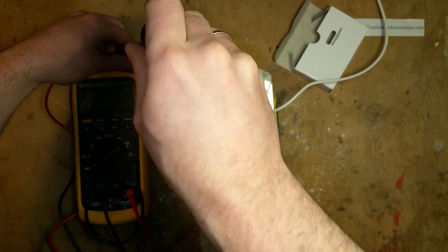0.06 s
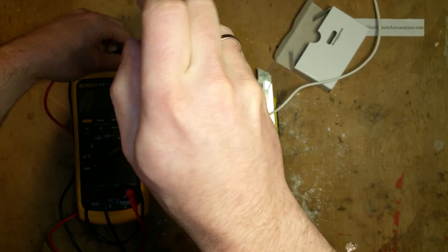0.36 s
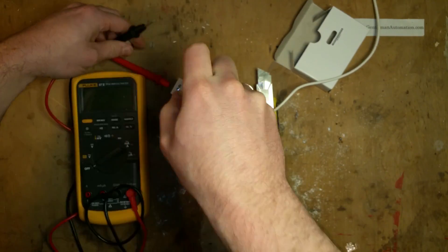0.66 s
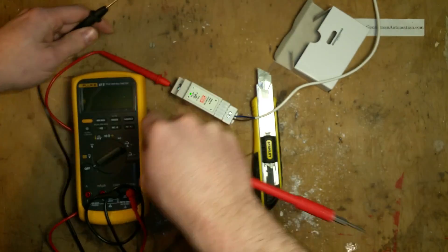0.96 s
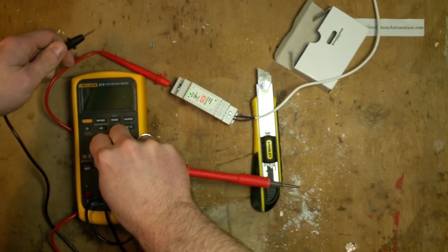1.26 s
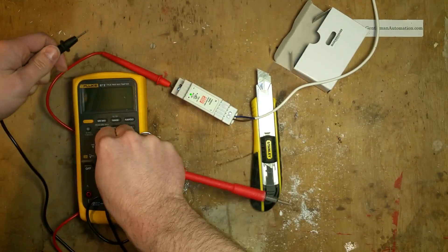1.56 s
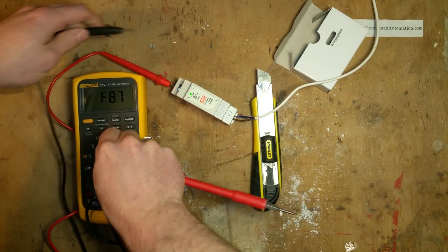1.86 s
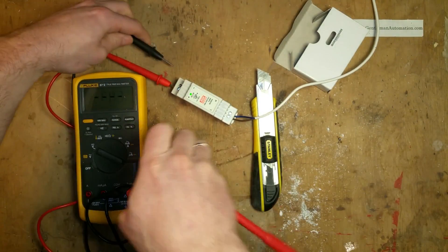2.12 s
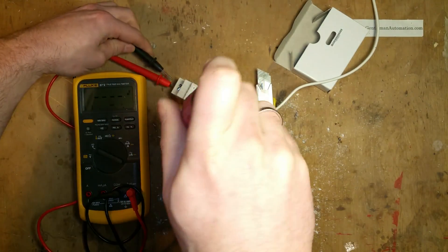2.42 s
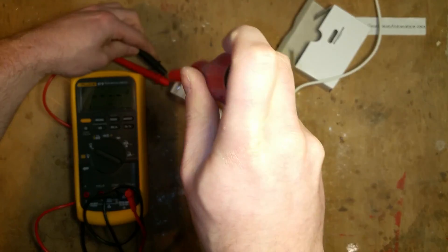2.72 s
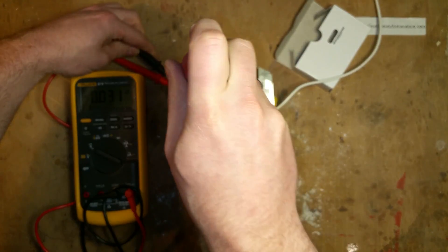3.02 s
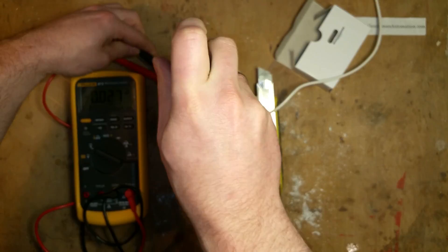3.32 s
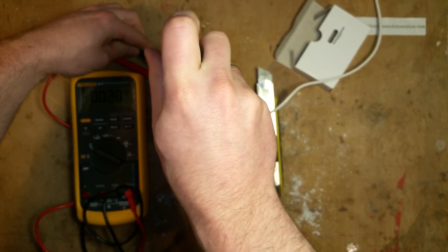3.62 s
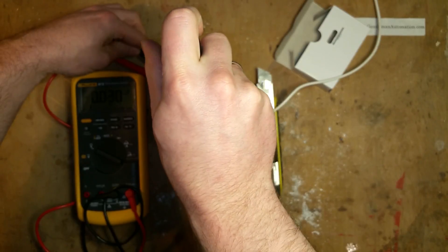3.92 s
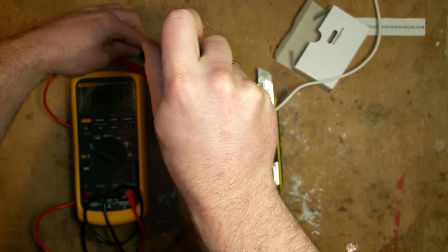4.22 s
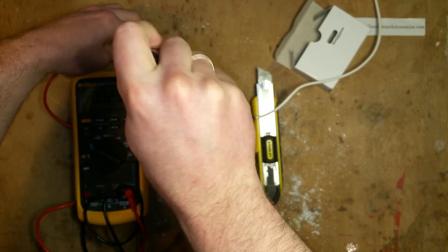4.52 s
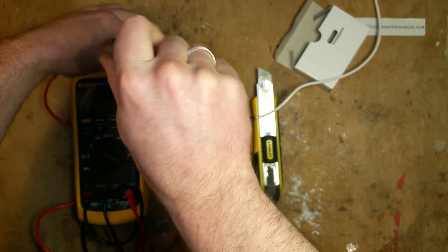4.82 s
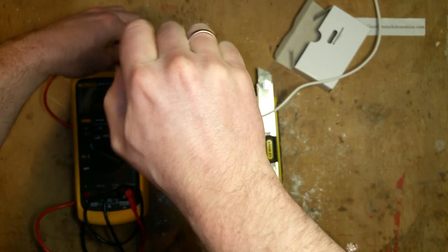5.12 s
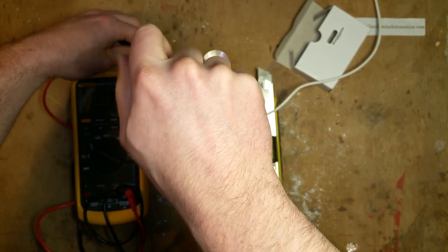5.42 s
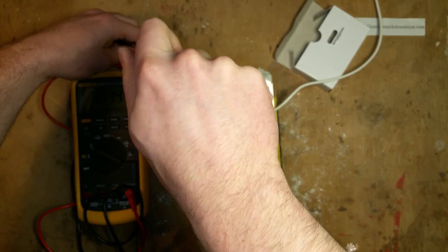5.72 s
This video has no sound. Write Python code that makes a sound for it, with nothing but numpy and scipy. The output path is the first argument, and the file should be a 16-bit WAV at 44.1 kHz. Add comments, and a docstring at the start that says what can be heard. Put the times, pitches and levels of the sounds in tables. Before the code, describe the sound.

The microphone is just above a wooden workbench in a quiet, dry room with a faint low rumble. After slight chattering, a small plastic power supply tips and clatters onto the bench at about 0.25 seconds, the loudest sound, with a woody thud and a hard plastic click. Faint scratches of a probe tip on a screw and small taps follow until 0.9 seconds. A multimeter's rotary switch clicks crisply at 1.55 seconds and more softly at 1.75. A dull little bump comes at 2.2 seconds, then a lull with faint rustles of hands and leads and tiny ticks. From 3.4 seconds the probes tap lightly on the terminals, with a soft knock at 3.4, a small ping at 3.6, and more taps near 3.7, 4.3 and 4.7. Quiet rattles, taps and faint scrapes continue from 5.2 to about 5.9 seconds.

```python
"""Meter probes on a workbench

A quiet, dry room, the microphone just above a wooden bench. Probes press on the screw terminals of a
small plastic power supply; the box tips and clatters down, each contact ringing bench, box and probe.
The meter's rotary switch clicks twice as a sprung ball drops into its notches. Then the probes tap and
scratch at the screws again, among faint rustles and ticks."""
import sys
import numpy as np
from scipy import signal
from scipy.fft import rfft, irfft
from scipy.io import wavfile
from scipy.ndimage import uniform_filter1d

SR = 44100
rng = np.random.default_rng(int(sys.argv[2]) if len(sys.argv) > 2 else 0)


def file_out(sig):
    """Save sig as 16-bit WAV at sys.argv[1]."""
    # one column per channel
    cols = np.atleast_2d(sig).T
    # limit, then scale
    lim = np.clip(cols, -1, 1)
    pcm = np.round(lim * 32767).astype(np.int16)
    wavfile.write(sys.argv[1], SR, pcm)


N = 258889

# Clear modes of the bench top, plastic box and probe shaft: pitch_hz, level_db, t60_s
BENCH_MODES = [(68, -17.5, 0.06), (128, -10, .09), (215, -2.5, 0.12), (252.2, 2.5, 0.12), (345, -10, 0.089),
               (392, -5, 0.048), (485, -8.5, 0.054), (590, -6.5, 0.043), (670, -13, 0.05)]
BOX_MODES = [(1027, -22, .04), (1335, -8, 0.04), (1487, -2, .06), (1697, 0.5, .055), (1888, -2.5, .06),
             (2020, -5, .055), (2446, -10.5, .04)]
SHAFT_MODES = [(3160, -3, .045), (3247, -1, 0.082), (3430, -2, 0.059), (3860, -7, 0.047),
               (4350, -7.5, .035), (4780, -10.5, 0.04)]
# Spectra of the dense, quickly damped modes of each part: pitch_hz, level_db
BENCH_SPECTRUM = [(30, -44), (60, -24.5), (100, -12), (250, 0.5), (600, -3.5), (850, -14), (1300, -24.5),
                  (3000, -60.5)]
BOX_SPECTRUM = [(300, -34), (700, -17), (1000, -15), (1400, -2), (1800, 1), (2500, -8.5), (4000, -25),
                (9000, -49.5)]
SHAFT_SPECTRUM = [(1200, -27), (2600, -5.5), (3300, 1), (4500, -7), (5800, -23.5), (9000, -33)]
TIP_SPECTRUM = [(2000, -24), (5000, -3), (6500, -3), (9000, 1.5), (12500, 2.5), (14500, -7), (16000, -9)]
def contact(bench_db, box_db, shaft_db, tip_db=-8, light_rise_s=.0025, firm_rise_s=.0007):
    """One contact rings bench, box, probe shaft and metal tip; firm ones land at once, light ones drag."""
    rise_s = np.interp(max(bench_db, box_db), [-62, -35], [light_rise_s, firm_rise_s])
    wall_tilt = np.interp(box_db, [-50, -30], [1, -5])  # heavy blows bend the walls, favouring low modes
    bench = ring(BENCH_MODES, BENCH_SPECTRUM, dense_db=-6, dense_t60=.022, spread=.015,
                 tilt_db_per_octave=2, rise_s=rise_s)
    box = ring(BOX_MODES, BOX_SPECTRUM, dense_db=3, dense_t60=.076, spread=.0015,
               tilt_db_per_octave=wall_tilt, rise_s=rise_s)
    shaft = ring(SHAFT_MODES, SHAFT_SPECTRUM, dense_db=5, dense_t60=.036, spread=.0045, rise_s=rise_s)
    tip = ring([], TIP_SPECTRUM, dense_db=0, dense_t60=.056, rise_s=rise_s)
    return amp(bench_db) * bench + amp(box_db) * box + amp(shaft_db) * (shaft + amp(tip_db) * tip)


# Knocks of probe and box, close under the microphone: start_s, bench_db, box_db, shaft_db
KNOCK_HITS = [(0.1557, -72, -56, -58.5), (0.188, -69, -58, -57.5), (0.2323, -33.5, -47, -32.5),
              (0.2415, -21.5, -37, -30), (0.2431, -32, -24.5, -31.5), (0.286, -33, -44, -44.5),
              (0.349, -48, -52.5, -54), (0.362, -55, -58, -62), (0.547, -70, -65, -65),
              (0.745, -67.5, -77, -79), (0.887, -54.5, -54, -58.5), (1.394, -76, -69, -82),
              (1.65, -61.5, -65, -81), (2.116, -80, -70, -72), (2.1993, -56, -69, -73),
              (3.423, -44.5, -51, -58), (3.5367, -62, -70.5, -77), (3.569, -73, -52.5, -70.5),
              (3.68, -65, -58, -63.5), (3.702, -48.5, -61, -62.5), (4.083, -68.5, -76, -78.5),
              (4.237, -62.5, -59.5, -73), (4.257, -69.5, -65, -77), (4.315, -57, -67, -69),
              (4.344, -54.5, -65.5, -72.5), (4.679, -48, -65.5, -63.5), (5.188, -65, -74, -79.5),
              (5.436, -54, -77, -81.5), (5.529, -62.5, -70.5, -71.5), (5.622, -60, -70.5, -76),
              (5.797, -65.5, -68.5, -71.5)]
# Pings of a probe's sleeve and bumps of its handle: start_s, level_db
SLEEVE_PINGS = [(.1948, -45.5), (3.572, -55.5), (4.675, -64)]
HANDLE_BUMPS = [(2.2011, -49), (4.694, -49)]
# Modes of the sleeve and the handle: pitch_hz, level_db, t60_s
SLEEVE_MODES = [(1680, -9, 0.03), (2068, -1, 0.09), (1900, 1, 0.1), (2200, -12, 0.05)]
HANDLE_MODES = [(292, 2.5, 0.04), (363, 4.5, 0.045), (392, 1.5, 0.03)]
def knocks():
    """Single contacts, a sleeve ringing freely as a probe slips off, and a rubbery handle's dull bump."""
    out = np.zeros(N)
    for start_s, bench_db, box_db, shaft_db in KNOCK_HITS:
        add(out, start_s, contact(bench_db, box_db, shaft_db))
    for start_s, level_db in SLEEVE_PINGS:
        ping = ring(SLEEVE_MODES, BOX_SPECTRUM, dense_db=-5, dense_t60=.04)
        add(out, start_s, amp(level_db) * ping)
    for start_s, level_db in HANDLE_BUMPS:
        bump = ring(HANDLE_MODES, BENCH_SPECTRUM, dense_db=-27, dense_t60=.033, rise_s=.0025)
        add(out, start_s, amp(level_db) * bump)
    return out


# Runs of chatter on the bench: start_s, length_s, thud_db, click_db
RATTLE_RUNS = [(0.015, .11, -68.5, -71), (0.264, 0.054, -37, -44), (3.433, .03, -55.5, -64),
               (4.668, 0.022, -59, -59), (5.353, .07, -65, -78.5), (5.546, 0.065, -53, -71)]
def rattles(count=5, jitter=.33, fall_db=-7.5, shaft_db=-2.5):
    """A loose part chatters in a quick, fading run of contacts at uneven gaps."""
    out = np.zeros(N)
    for start_s, length_s, thud_db, click_db in RATTLE_RUNS:
        gaps = 1 + jitter * rng.uniform(-1, 1, count)
        for progress in (np.cumsum(gaps) - gaps) / count:
            fade_db = fall_db * progress
            hit = contact(thud_db + fade_db, click_db + fade_db, click_db + shaft_db + fade_db)
            add(out, start_s + length_s * progress, hit)
    return out


def lightweight(x, cutoff_hz=119.7):
    """Light plastic parts hardly move the bench in the deep bass."""
    return signal.sosfilt(signal.butter(2, cutoff_hz, "high", fs=SR, output="sos"), x)


# Soft, low pushes under firm taps: start_s, level_db
HAND_PRESSES = [(3.424, -49), (3.701, -57), (4.678, -57)]
# Slow bending modes of the bench top: pitch_hz, level_db, t60_s
FLEX_MODES = [(72.3, -2.5, 0.18), (105, 1.5, .1), (123.3, 0, 0.15)]
def presses():
    """The hand's weight comes down on a probe and flexes the bench top."""
    out = np.zeros(N)
    for start_s, level_db in HAND_PRESSES:
        flex = ring(FLEX_MODES, BENCH_SPECTRUM, dense_db=-13.5, dense_t60=.034, rise_s=.0037)
        add(out, start_s, amp(level_db) * flex)
    return out


# Switch steps of the meter on the bench: start_s, spring_db, housing_db, ball_db, meter_db
SWITCH_STEPS = [(1.549, -34.5, -51.5, -39, -41.5), (1.7294, -52.5, -50, -45.5, -46.5)]
# Modes of the spring, the housing and the whole meter rocking: pitch_hz, level_db, t60_s
SPRING_MODES = [(11450, 2.5, 0.031), (12080, -1.5, 0.041), (12000, -18.5, .03), (12750, -20.5, 0.0222),
                (15100, -7, 0.019)]
HOUSING_MODES = [(1208, -11.5, 0.055), (2056, -5, 0.045), (3100, -8.5, .05), (4300, 0, 0.005),
                 (5200, 0.5, 0.008), (9950, -10.5, 0.06)]
METER_MODES = [(60.5, 1.5, 0.18), (104, -1, 0.066), (221.8, -1.5, 0.17), (256, -2.5, 0.075),
               (418, -4.5, 0.15)]
# Spectra of the switch parts' dense modes: pitch_hz, level_db
SPRING_SPECTRUM = [(3000, -26.5), (6500, -43.5), (8500, -41), (10000, -4), (12500, 15), (14200, -10.5),
                   (16000, 5.5)]
HOUSING_SPECTRUM = [(200, -39.5), (700, 7), (2300, 8), (4800, -8.5), (6000, -8), (9000, -18.5),
                    (16000, -1.5)]
BALL_SPECTRUM = [(2500, -9), (4200, -3.5), (5100, 1), (6300, -16), (8000, -3), (11200, 0), (13000, 3),
                 (16000, -13)]
def rotary_switch(settle_s=.029, thud_db=-10, click_db=-26.5):
    """A ball snaps into its notch, ringing spring and housing; the meter rocks in its boot and settles."""
    out = np.zeros(N)
    for start_s, spring_db, housing_db, ball_db, meter_db in SWITCH_STEPS:
        spring = ring(SPRING_MODES, SPRING_SPECTRUM, dense_db=5, dense_t60=.021, spread=.004)
        housing = ring(HOUSING_MODES, HOUSING_SPECTRUM, dense_db=-1, dense_t60=.082)
        ball = ring([], BALL_SPECTRUM, dense_db=0, dense_t60=.023)
        rocking = ring(METER_MODES, BENCH_SPECTRUM, dense_db=-6.5, dense_t60=.025, rise_s=.0044)
        settling = contact(meter_db + thud_db, meter_db + click_db, meter_db + click_db)
        add(out, start_s, amp(spring_db) * spring + amp(housing_db) * housing + amp(ball_db) * ball)
        add(out, start_s + .0033, amp(meter_db) * rocking)
        add(out, start_s + settle_s, settling)
    return out


# A probe tip sliding on a terminal screw: start_s, length_s, level_db
TIP_SLIDES = [(0.549, 0.079, -68), (0.782, 0.064, -76.5), (0.839, 0.056, -70.5), (4.321, 0.029, -67.5),
              (5.568, 0.12, -80), (5.77, 0.096, -80.5)]
# Modes of the screw: pitch_hz, level_db, t60_s
SCREW_MODES = [(3290, -16, 0.036), (3430, -1, 0.024), (4590, -12, 0.034)]
def scrapes(slips_per_s=1500, box_db=-7):
    """The tip sticks and slips; every slip rings the screw and, less, the box."""
    out = np.zeros(N)
    for start_s, length_s, level_db in TIP_SLIDES:
        n = round(length_s * SR)
        slips = rng.exponential(1, n) * (rng.random(n) < slips_per_s / SR)
        screw = ring(SCREW_MODES, SHAFT_SPECTRUM, dense_db=-2, dense_t60=.026)
        box = ring(BOX_MODES, BOX_SPECTRUM, dense_db=15, dense_t60=.031)
        scrape = signal.fftconvolve(slips * signal.windows.tukey(n, .5), screw + amp(box_db) * box)
        add(out, start_s, amp(level_db) * scrape / (np.std(scrape[:n]) + 1e-12))
    return out


# Faint rustles near the microphone: start_s, length_s, level_db, centre_hz
# The second is a short rush of noise just before the first switch click; the rest are skin and leads.
RUSTLES = [(1.292, .14, -74.5, 545), (1.531, 0.02, -63.5, 1152), (1.618, 0.17, -68.5, 392),
           (1.928, 0.11, -68, 438.5), (1.952, 0.57, -88.5, 11500), (2.794, 0.056, -74, 850),
           (2.87, 0.073, -71.5, 700), (3.622, 0.023, -67.5, 634), (5.179, 0.087, -76, 603),
           (5.551, 0.17, -71.5, 636)]
def rustles(grain_db=4):
    """Soft, grainy noise with one broad resonance."""
    out = np.zeros(N)
    for start_s, length_s, level_db, hz in RUSTLES:
        n = round(length_s * SR)
        grain = amp(grain_db * unit_rms(uniform_filter1d(rng.standard_normal(n), size=300)))
        resonance = [(hz / 6, -18), (hz / 3, -8), (hz, 0), (hz * 1.25, -10), (hz * 5, -21), (hz * 18, -38)]
        rustle = colour(grain * rng.standard_normal(n), resonance)
        add(out, start_s, amp(level_db) * unit_rms(rustle * signal.windows.tukey(n, .6)))
    return out


# Faint ticks: start_s
TICK_TIMES = [1.872, 2.529, 4.169, 4.828, 5.486]
def ticks(level_db=-73):
    """Tiny, dry, isolated clicks with no ring."""
    out = np.zeros(N)
    for start_s in TICK_TIMES:
        add(out, start_s, amp(level_db) * ring([], HOUSING_SPECTRUM, dense_db=0, dense_t60=.0021))
    return out


# Decay of the room around the bench: pitch_hz, t60_s
ROOM_DECAY = [(60, 0.13), (250, 0.13), (1000, .12), (2500, .125), (6000, 0.14), (15000, .13)]
def room(x, wet_db, early_s=.034, gap_s=.0061, echoes_per_s=4000):
    """Reflections from bench and near walls hold for a moment, then each band dies at its own speed."""
    n = SR // 2
    t = np.arange(n) / SR
    echoes = rng.choice([-1., 1.], n) * (rng.random(n) < echoes_per_s / SR) * (t > gap_s)
    hz, time_s, bands = signal.stft(echoes, SR, nperseg=256)
    tone_db = curve([(400, -5), (1100, 0)], hz)[:, None]  # small near surfaces return little bass
    decay_db = 60 * np.maximum(time_s - early_s, 0) / curve(ROOM_DECAY, hz)[:, None]
    tail = signal.istft(bands * amp(tone_db - decay_db), SR, nperseg=256)[1]
    return x + amp(wet_db) * signal.fftconvolve(x, tail / np.linalg.norm(tail))[:N]


# Treble balance at the microphone: pitch_hz, left_minus_right_db
PORT_BALANCE = [(2500, 2.5), (3500, -3.5), (4800, -4.5), (5900, -10.5), (6700, 0.5), (7900, 12), (9500, 4)]
def microphone_ports(x):
    """The two ports favour one side or the other in the treble; bass and top treble reach both alike."""
    lean = amp(curve([(1800, 0), *PORT_BALANCE, (11000, 0)], np.fft.rfftfreq(N, 1 / SR)))
    gains = 2 * np.array([lean, np.ones(len(lean))]) / (1 + lean)
    return irfft(rfft(x) * gains, N)


# Spectra of the room tone at the bench and of the microphone's hiss: pitch_hz, level_db
RUMBLE_SPECTRUM = [(15, -42), (25, -14), (33, -24), (56, -3.5), (82, -3.5), (261, -9), (392, -11.5),
                   (473, -14), (587, -15), (1010, -18.5), (2150, -24), (2660, -26), (4330, -33),
                   (13400, -34.5), (15800, -35)]
HISS_SPECTRUM = [(24, -39), (40, -6), (130, -8), (513, -13), (659, -11.5), (1620, -15.5), (15800, -20)]
def background(rumble_db=-70, hiss_db=-81, dip_hz=2130, dip_width_hz=130, dip_db=-9):
    """Steady room rumble in the centre, hollow in one narrow band, and faint, wide microphone hiss."""
    hz = np.fft.rfftfreq(N, 1 / SR)
    hollow_db = dip_db * np.exp(-((hz - dip_hz) / dip_width_hz) ** 2)
    rumble = irfft(rfft(rng.standard_normal(N)) * amp(curve(RUMBLE_SPECTRUM, hz) + hollow_db), N)
    hiss = irfft(rfft(rng.standard_normal(N)) * amp(curve(HISS_SPECTRUM, hz)), N)
    return amp(rumble_db) * unit_rms(rumble) + amp(hiss_db) * unit_rms(np.array([hiss, -hiss]))


def ring(modes, spectrum, dense_db, dense_t60, spread=.0092, tilt_db_per_octave=0, rise_s=.0001):
    """Clear modes over a noise burst of dense ones; the tilt brightens or darkens them above 260 Hz."""
    def tilt_db(hz):
        return tilt_db_per_octave * np.log2(max(hz / 260, 1))

    t = np.arange(SR // 4) / SR
    onset = 1 - np.exp(-t / rise_s)  # the ring builds up while the parts touch
    noise = rng.standard_normal(len(t)) * onset * amp(-60 * t / dense_t60)
    burst = unit_attack(colour(noise, [(hz, db + tilt_db(hz)) for hz, db in spectrum]))
    clear = np.zeros(len(t))
    for (hz, db, t60), (shift, weight) in zip(modes, rng.standard_normal((len(modes), 2))):
        level_db = db + 2.14 * weight + tilt_db(hz)  # the weight depends on where the blow lands
        clear += amp(level_db - 60 * t / t60) * np.cos(2 * np.pi * hz * (1 + spread * shift) * t)
    return unit_attack(unit_attack(clear * onset) + amp(dense_db) * burst)


def colour(x, spectrum, size=2048):
    """Minimum-phase filter with the given spectrum."""
    log_gain = np.log(amp(curve(spectrum, abs(np.fft.fftfreq(size, 1 / SR)))))
    taps = np.fft.ifft(np.exp(np.conj(signal.hilbert(log_gain)))).real
    return signal.fftconvolve(x, taps[:size // 2])[:len(x)]


def curve(points, hz):
    """Joins points by straight lines over log frequency."""
    point_hz, values = np.transpose(points)
    return np.interp(np.log(hz + 1), np.log(point_hz + 1), values)


def amp(db):
    return 10 ** (np.asarray(db) / 20)


def unit_rms(x):
    return x / np.sqrt(np.mean(x ** 2) + 1e-20)


def unit_attack(x):
    """Scales a ring to rms 1 over its first 15 ms."""
    return x / np.sqrt(np.mean(x[:round(.015 * SR)] ** 2) + 1e-20)


def add(mix, start_s, sound):
    part = mix[max(round(start_s * SR), 0):][:len(sound)]
    part += sound[:len(part)]


def scene():
    """Probes, meter and small noises from just above the bench, over the room tone."""
    room_tone = background()
    probes = room(lightweight(knocks() + rattles()) + presses(), wet_db=-11.5)
    meter = room(rotary_switch(), wet_db=-9.5, early_s=.012)
    small_noises = ticks() + room(scrapes() + rustles(), wet_db=-11.5)
    return microphone_ports(probes + meter + small_noises) + room_tone


def record(dry, low_cut_hz=44, high_cut_hz=15950):
    """The recorder's low cut and band limit."""
    thinned = signal.sosfilt(signal.butter(3, low_cut_hz, "high", fs=SR, output="sos"), dry)
    band_limit = signal.firwin(401, high_cut_hz, window=("kaiser", 9), fs=SR)
    return signal.oaconvolve(thinned, band_limit[None], "same")


dry = scene()
out = record(dry)
file_out(out)
```